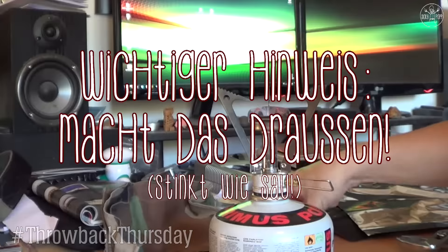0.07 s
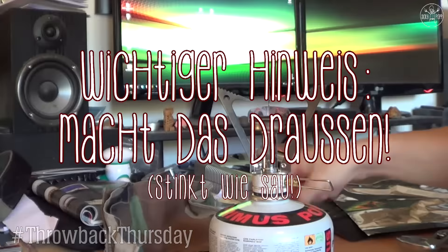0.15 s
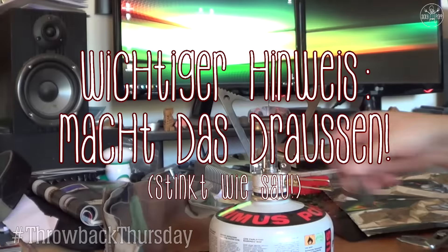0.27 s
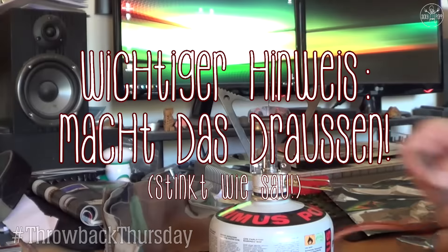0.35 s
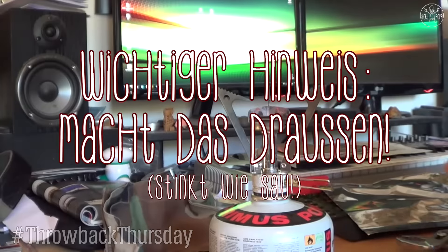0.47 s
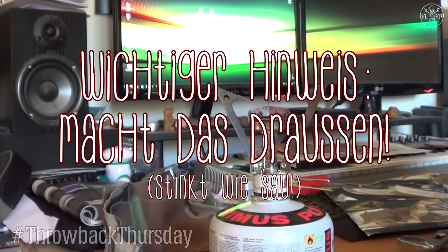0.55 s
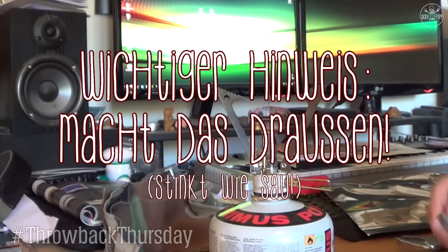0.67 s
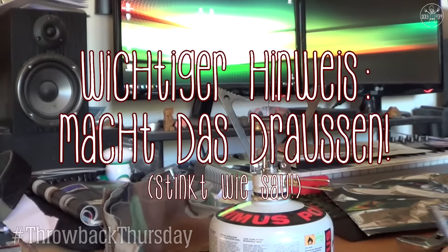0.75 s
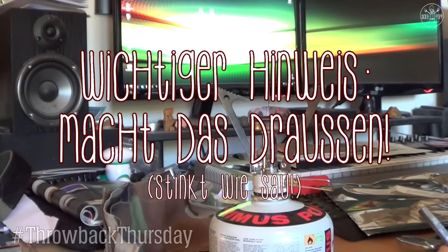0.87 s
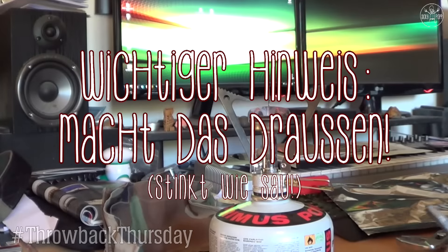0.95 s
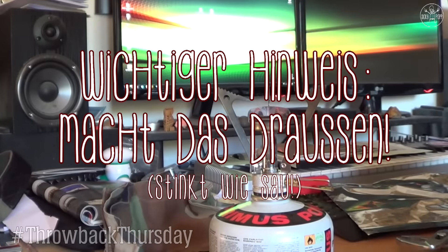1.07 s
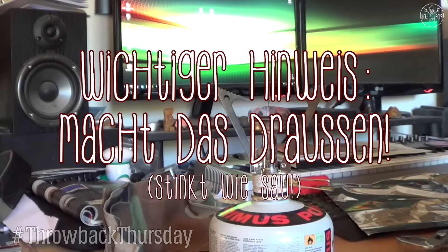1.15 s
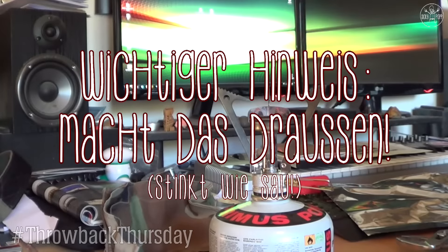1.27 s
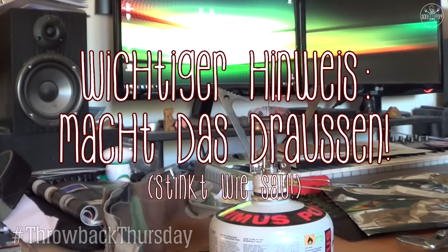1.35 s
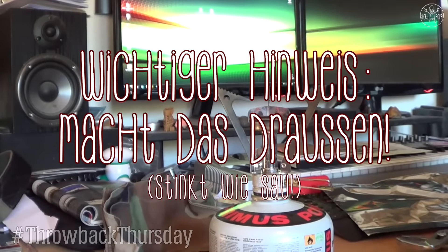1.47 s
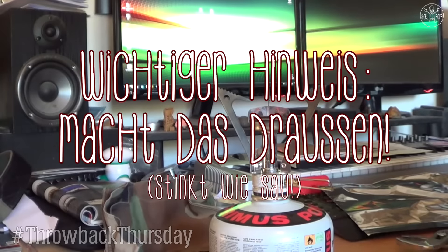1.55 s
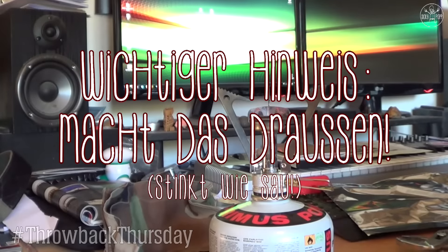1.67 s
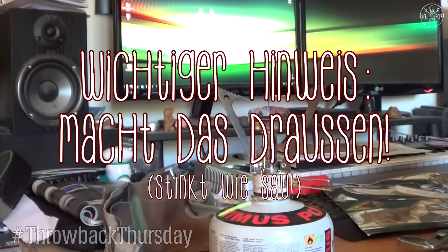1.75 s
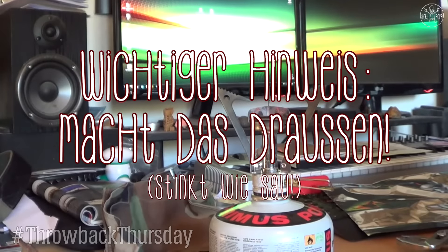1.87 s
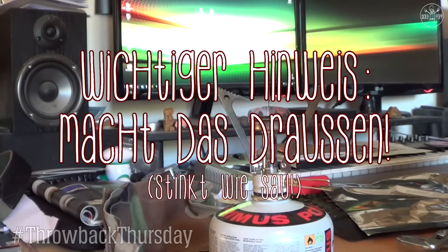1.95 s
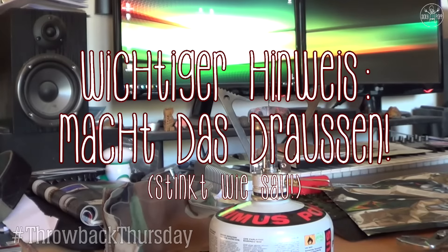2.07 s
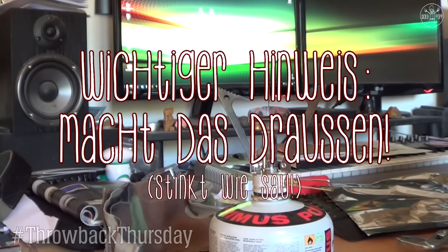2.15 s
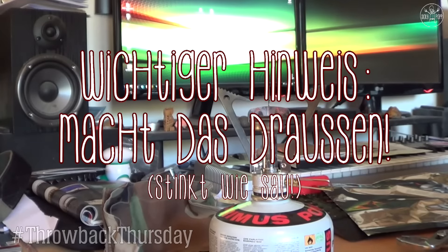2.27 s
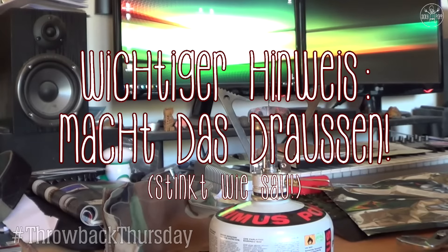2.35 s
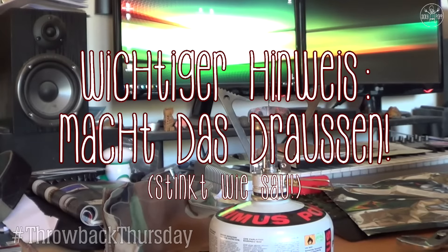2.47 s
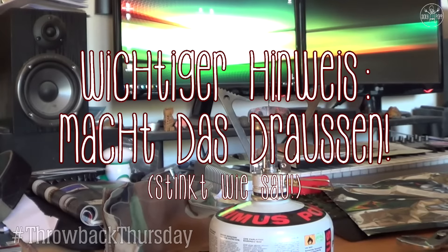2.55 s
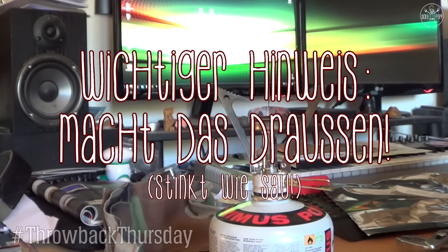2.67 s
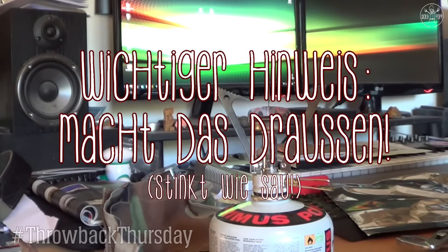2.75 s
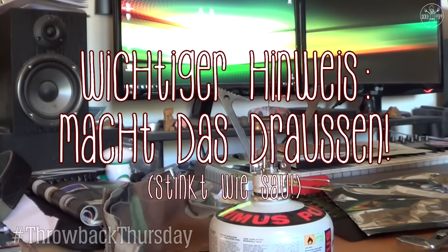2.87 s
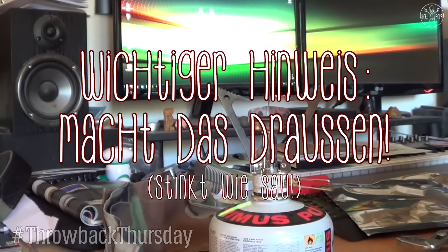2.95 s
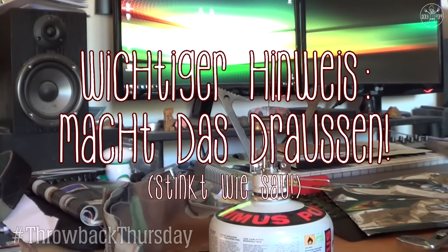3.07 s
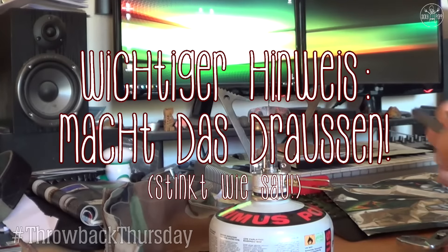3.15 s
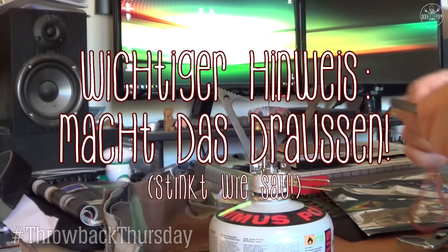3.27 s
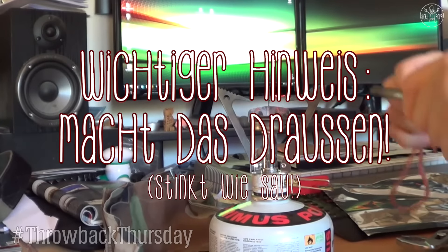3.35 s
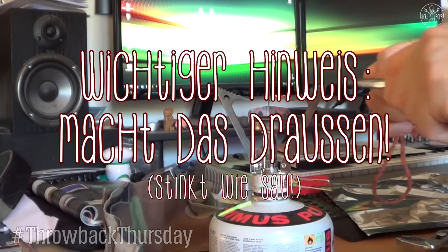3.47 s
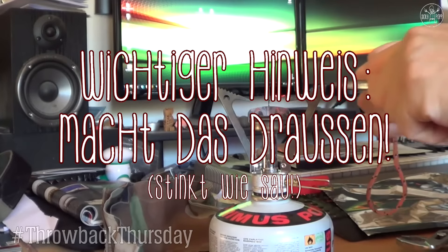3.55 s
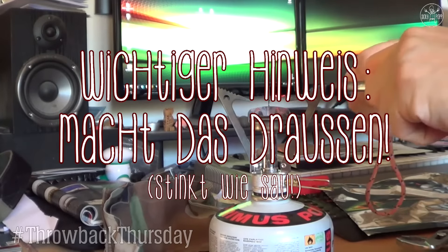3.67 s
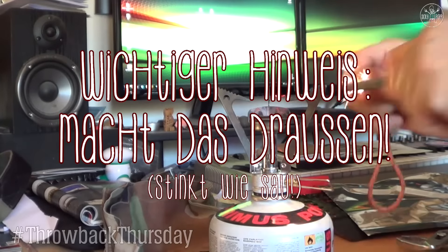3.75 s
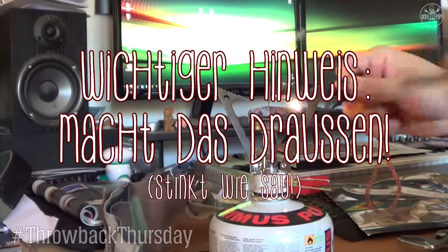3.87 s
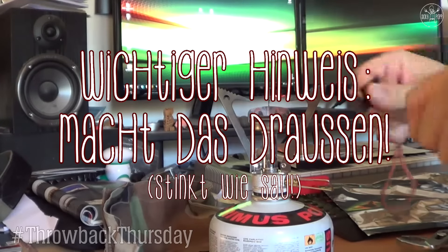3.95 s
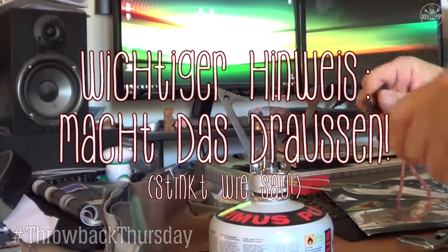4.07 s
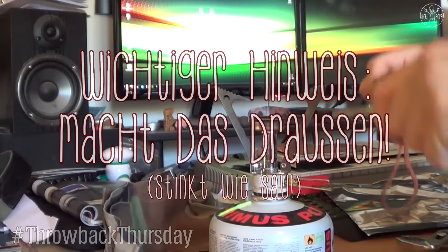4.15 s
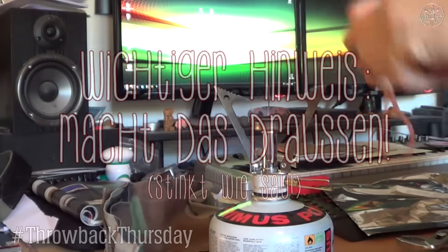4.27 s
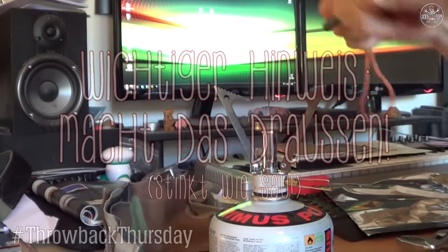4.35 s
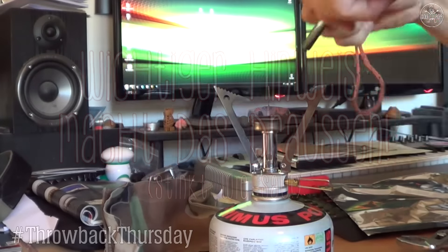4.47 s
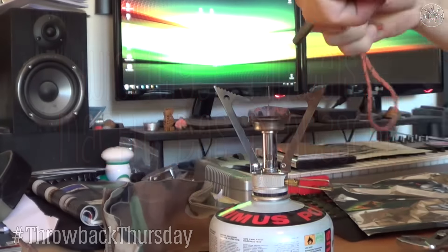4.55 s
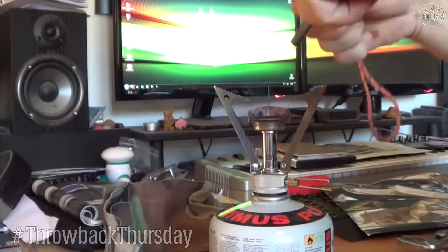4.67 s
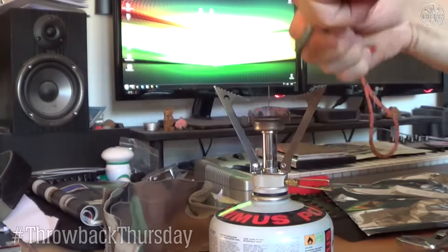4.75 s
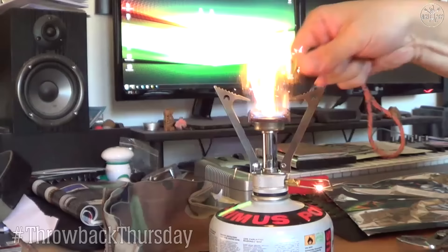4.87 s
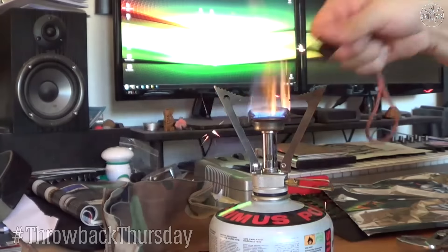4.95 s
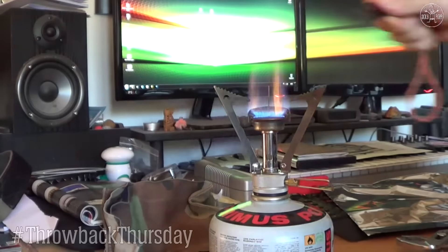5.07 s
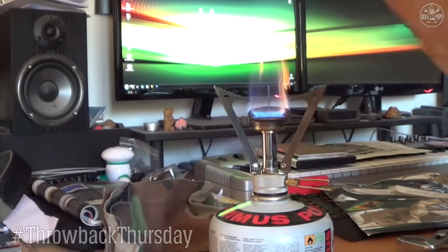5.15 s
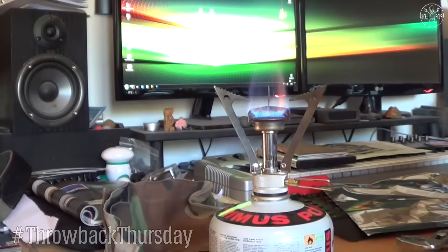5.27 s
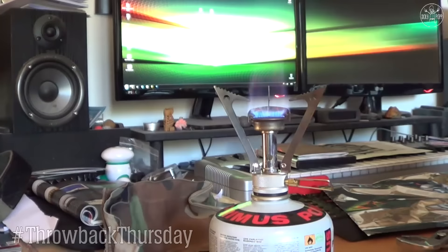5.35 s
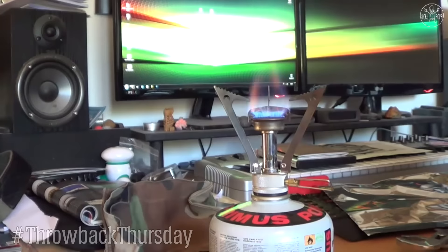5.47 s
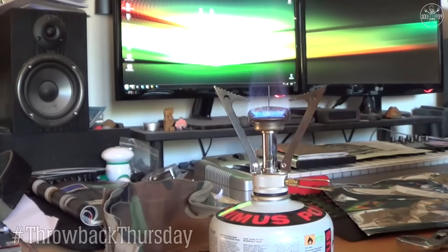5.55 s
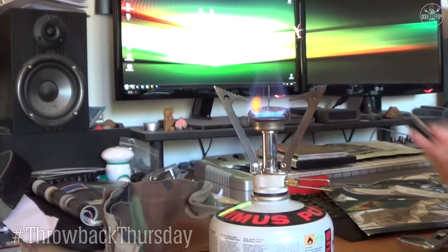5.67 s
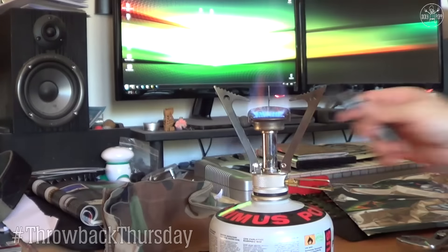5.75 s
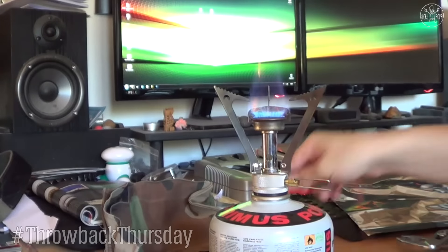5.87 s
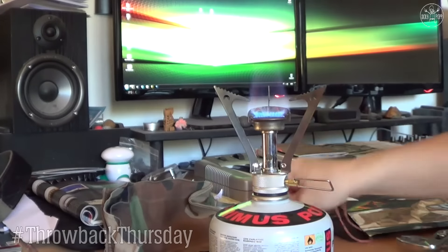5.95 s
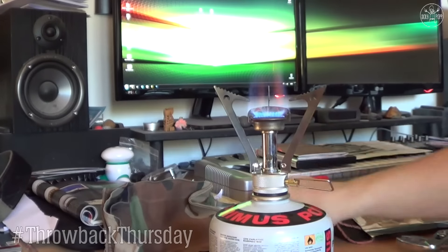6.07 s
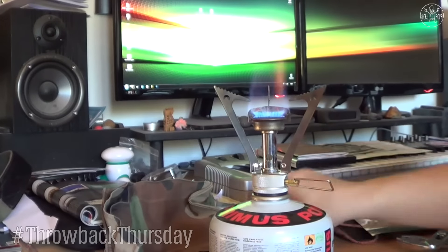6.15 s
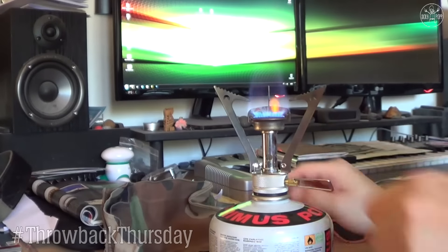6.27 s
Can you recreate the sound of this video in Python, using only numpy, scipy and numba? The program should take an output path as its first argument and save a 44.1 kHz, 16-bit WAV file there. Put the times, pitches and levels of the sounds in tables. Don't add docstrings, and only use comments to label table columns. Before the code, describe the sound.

Close stereo in a furnished room: steel tools clatter and ring on a desk for under a second, then knock again around 1.6 seconds. A faint gas hiss continues. Light ticks of handled metal lead to a harsh scrape, then a second that ignites the burner with a soft puff. The flame flutters and roars steadily; finally the tools drop and bounce loudly on the desk.

```python
import sys
import numpy as np
from scipy import signal
from scipy.fft import rfft, irfft, next_fast_len
from scipy.io import wavfile
from scipy.ndimage import uniform_filter1d, minimum_filter1d, map_coordinates
from numba import njit

SR = 44100
rng = np.random.default_rng(int(sys.argv[2]) if len(sys.argv) > 2 else 0)


def attenuation_scalar(level_db):
    decades = np.asarray(level_db, float) / 20
    return 10 ** decades


def unload_audio(sound):
    columns = np.transpose(np.atleast_2d(sound))
    steps = np.round(np.clip(columns, -1, 1) * 32767)
    wavfile.write(sys.argv[1], SR, steps.astype(np.int16))


N = 277874
TIME_S = np.arange(N) / SR

# frequency_hz, likeness (-1 to 1)
FAR_LIKENESS = [(60, 1), (400, 0.99), (1200, 0.24), (3000, 0.95), (7000, 1), (15000, 0.97)]
# start_s, main_modes_db, overtones_db
ROD_RINGS = [(0, -38, -49), (.133, -47, -46), (.288, -51, -60), (0.331, -28.5, -44), (.37, -30.5, -53),
             (.466, -23, -20), (0.487, -13, -24), (.511, -37, -29), (.522, -27, -25), (.554, -32, -33.5),
             (.613, -17, -50), (0.626, -21.5, -29), (.645, -31, -42), (.662, -42, -30), (.677, -46, -44),
             (1.55, -41, -42), (1.614, -23, -38), (1.631, -33.5, -43), (1.844, -32, -24.5),
             (1.874, -24.5, -29.5), (1.9, -25, -25.5), (5.435, -60, -26), (5.448, -62, -40),
             (6.073, -53, -48), (6.116, -34, -41), (6.131, -53, -63), (6.147, -55, -38),
             (6.178, -27.5, -29), (6.208, -26, -28), (6.248, -52, -30), (6.272, -36, -31.5)]
# start_s, main_modes_db, overtones_db
STRIKER_RINGS = [(0, -44, -55), (.133, -55, -51.5), (.309, -35, -39.5), (.37, -42.5, -42),
                 (.4717, -32, -32), (0.488, -22, -23), (.522, -25, -31.5), (.613, -26.5, -31),
                 (.645, -45, -26), (0.661, -27, -43), (.677, -53, -56), (1.549, -56, -58),
                 (1.616, -36.5, -42), (1.632, -30.5, -52), (1.749, -43, -68), (1.843, -32, -48),
                 (1.874, -42, -41.5), (1.9, -32, -47), (1.94, -50, -54), (5.435, -48, -26),
                 (5.448, -44, -48), (6.072, -37, -39), (6.116, -33.5, -43), (6.131, -60, -55),
                 (6.147, -27, -24.5), (6.178, -31, -38)]
SWELLS = [.37, .554, 1.75, 6.178]


def unit(x):
    return x / np.sqrt(np.mean(x ** 2) + 1e-20)


def along(points, hz):
    f, v = np.transpose(points)
    return np.interp(np.log(hz + 1), np.log(f + 1), v)


def wobble(rate):
    knots = rng.standard_normal(int(N * rate / SR) + 4)
    return map_coordinates(knots, [np.arange(N) * rate / SR])


def filtered(x, response):
    m = next_fast_len(N + SR // 2)
    return irfft(rfft(x, m) * response(np.fft.rfftfreq(m, 1 / SR)), m)[..., :N]


def resonances(peaks):
    def response(f):
        total = 0
        for k, (centre, width, db) in enumerate(peaks):
            total = total + (-1) ** k * attenuation_scalar(db) * 1j * f * width / (centre ** 2 - f * f + 1j * f * width)
        return total
    return response


def strokes(rows, rise, fall):
    s, db, hold = np.transpose(rows)[..., None]
    before = np.clip(s - TIME_S, 0, None)
    after = np.clip(TIME_S - s - hold, 0, None)
    return (db - rise * before - fall * after).max(axis=0)


def rush(spectrum, likeness, patchy_db):
    z = signal.stft(rng.standard_normal((2, N)), nperseg=512)[2]
    field = uniform_filter1d(rng.standard_normal(z.shape[1:]), size=6, axis=0)
    field = uniform_filter1d(field, size=10, axis=1)
    pair = signal.istft(z * attenuation_scalar(patchy_db * unit(field)), nperseg=512)[1][:, :N]

    def spread(hz):
        angle = np.arccos(np.clip(along(likeness, hz), -1, 1)) / 2
        return attenuation_scalar(along(spectrum, hz)) * [np.cos(angle), np.sin(angle)]

    mid, side = filtered(pair, spread)
    return unit(np.array([mid + side, mid - side]))


def grains(spectrum, rate, spread_db):
    size = attenuation_scalar(spread_db * rng.exponential(1, N))
    slips = (rng.random(N) < rate / SR) * rng.standard_normal(N) * size
    return unit(filtered(slips, lambda hz: attenuation_scalar(along(spectrum, hz))))


def cracks(times, dbs, hzs, t60s, width, strike=0):
    out, t = np.zeros(N + SR), np.arange(SR // 5) / SR
    hzs, t60s = np.broadcast_to(hzs, len(times)), np.broadcast_to(t60s, len(times))
    for s, db, hz, t60 in zip(times, dbs, hzs, t60s):
        noise = rng.standard_normal(len(t)) * attenuation_scalar(-60 * t / max(t60, .001)) + strike * (t == 0)
        edges = np.clip([hz / width, hz * width], 25, 14500)
        order = round(np.clip(.5 + hz / 400, 1.6, 3))
        burst = signal.lfilter(*signal.butter(order, edges, "band", fs=SR), noise)
        out[round(s * SR):][:len(t)] += attenuation_scalar(db) * burst / np.abs(burst).max()
    return out[:N]


def background():
    # start_s, level_db
    murmur_levels = [(1.3, -55), (2.2, -55.5), (2.68, -50.5), (3.08, -54.5)]
    # frequency_hz, density_db
    murmur_spectrum = [(15, -36), (25, -5), (46, 6), (64, -20), (109, -3), (143, -9), (167, -2.5),
                       (275, -6.5), (327, -1.5), (350, -11), (430, -7.5), (537, -9.5), (585, -8),
                       (1500, -17), (1950, -44), (3300, -120)]
    # start_s, level_db, hold_s
    drone_swells = [(3.23, -53.5, .4)]
    murmur_db = np.interp(TIME_S, *np.transpose(murmur_levels)) + 2.5 + 0.085 * wobble(8.3)
    murmur = attenuation_scalar(murmur_db) * rush(murmur_spectrum, FAR_LIKENESS, patchy_db=2.0)
    drone_db = strokes(drone_swells, rise=36, fall=85) + 10.5
    drone = attenuation_scalar(drone_db) * np.sin(2 * np.pi * 34 * TIME_S + .4 * wobble(3))
    whine_hz = 15625
    whine = attenuation_scalar(-68 + 3 * wobble(70)) * np.sin(2 * np.pi * whine_hz * TIME_S + .8 * wobble(150))
    return murmur + drone + whine


def walls(x):
    # frequency_hz, t60_s
    decay = [(200, 0.41), (2000, 0.31), (10000, 0.22)]
    hz, t, z = signal.stft(rng.standard_normal((2, SR // 2)), SR, nperseg=256)
    mid, side = signal.istft(z * attenuation_scalar(-60 * t / along(decay, hz)[:, None]), SR, nperseg=256)[1]
    tail = np.array([mid + 0.74 * side, mid - 0.14 * side])
    delayed = np.pad(x, (150, 0))[None]
    return signal.fftconvolve(delayed, tail / np.linalg.norm(tail[0]), axes=1)[:, :N]


def burner():
    # start_s, level_db
    jet_levels = [(1.2, -49.5), (2.2, -48.5), (4.85, -48.5), (4.97, -49), (5.6, -44.5)]
    # start_s, level_db
    flame_levels = [
        (4.79, -59),
        (4.836, -29),
        (5.432, -27),
        (5.454, -33.5),
        (5.47, -28.5),
        (6.07, -26.5),
        (6.27, -38),
    ]
    # frequency_hz, density_db
    jet_spectrum = [(710, -35), (1200, -21), (1250, -36), (1380, -9.5), (1980, -9.5), (2200, -4),
                    (3870, -6), (4360, -1.5), (5020, -5), (6440, -3.5), (8080, -14), (9310, -6),
                    (10700, -6), (14700, -25.5), (16000, -11)]
    flame_spectrum = [(24, -67), (40, -40), (75, -10.5), (262, -0.5), (422, -5), (663, 1), (1090, -13.5),
                      (1550, -14), (1810, -26), (2210, -14), (2500, -23.5), (3050, -22), (3700, -43),
                      (5050, -21), (8340, -29), (9690, -24), (16000, -53)]
    # frequency_hz, likeness (-1 to 1)
    near_likeness = [(60, .99), (500, 0.73), (1200, 0.78), (3000, 1), (7000, 1), (15000, .99)]
    jet_db = np.interp(TIME_S, *np.transpose(jet_levels)) + 3.5 + 0.13 * wobble(5.3)
    jet = attenuation_scalar(jet_db) * rush(jet_spectrum, FAR_LIKENESS, patchy_db=1.6)
    flutter_db = .3 * wobble(14) + .7 * wobble(55)
    flame_db = np.interp(TIME_S, *np.transpose(flame_levels), left=-150, right=-150)
    flame = attenuation_scalar(flame_db + flutter_db) * rush(flame_spectrum, near_likeness, patchy_db=0.3)
    return jet + flame


def chatter():
    # start_s, level_db, hold_s
    passes = [(.153, -36, 0.015), (.214, -37, 0.03), (.285, -36, .003)]
    count = np.floor(np.cumsum(230 * attenuation_scalar(3.3 * wobble(90))) / SR)
    catches = np.diff(count, prepend=0) * attenuation_scalar(rng.uniform(-12, 3.5, N))
    catches = catches + 0.041 * rng.standard_normal(N)
    body = resonances([(1500, 1600, 0)])
    return attenuation_scalar(strokes(passes, rise=200, fall=410)) * unit(filtered(catches, lambda f: body(f) ** 2))


def drag_level():
    # start_s, level_db, hold_s
    drags = [(0, -24.5, 0.017), (.29, -31.5, 0.042), (.468, -28.5, .002), (.55, -32, 0.14),
             (1.55, -37, .002), (1.604, -31, .002), (1.843, -25.5, 0.0043), (6.074, -24.5, .002),
             (6.104, -25, 0.21)]
    return strokes(drags, rise=23000, fall=275)


def friction():
    # start_s, level_db, hold_s
    scrapes = [
        (3.768, -22, 0.048),
        (4.803, -21.5, 0.022),
        (5.962, -34, 0.025),
    ]
    # start_s, level_db, hold_s
    bites = [
        (3.758, -24, 0.032),
        (4.787, -28.5, 0.011),
    ]
    # frequency_hz, density_db
    rub_spectrum = [(240, -16), (400, -15.5), (442, -3), (566, -8.5), (905, -4), (1060, -10), (1300, -6),
                    (4530, -17), (5800, -17), (10500, -22), (13000, -38), (15000, -60)]
    rasp_spectrum = [(1470, -19.5), (2500, -5), (2750, -11), (3610, -12.5), (6390, 0), (10100, -1),
                     (13700, -9.5), (15700, -17), (16200, -46)]
    grit_spectrum = [(150, -37), (250, -11), (592, -4.5), (771, -6.5), (1500, -10.5), (2750, -10),
                     (3500, -7), (4550, -35), (7700, -120)]
    # frequency_hz, width_hz, level_db
    sing_peaks = [(2800, 800, -3.5), (6300, 780, -2), (9600, 2000, -1)]
    drag = attenuation_scalar(drag_level() + 2.4 * wobble(130)) * grains(rub_spectrum, rate=5000, spread_db=1.5)
    scrape_db = strokes(scrapes, rise=960, fall=500)
    late_db = np.roll(scrape_db, round(0.025 * SR))
    low_db = np.minimum(scrape_db, late_db) - 9.5
    stutter_db = 2.9 * wobble(170)
    fine = attenuation_scalar(scrape_db + stutter_db) * grains(rasp_spectrum, rate=13000, spread_db=1.0)
    low = attenuation_scalar(low_db + stutter_db) * grains(grit_spectrum, rate=9800, spread_db=0.5)
    tone = unit(filtered(rng.standard_normal(N), lambda f: resonances(sing_peaks)(f) ** 2))
    sing = attenuation_scalar(strokes(bites, rise=2000, fall=690) + stutter_db) * tone
    return drag + fine + low + sing


def thumps():
    # start_s, peak_db, pitch_hz
    blows = [(.001, -29, 350), (.0011, -17, 2100), (.134, -33, 350), (.222, -34, 340), (.28, -35.5, 370),
             (.678, -25, 1000), (.89, -37.5, 124), (.948, -45, 570), (.95, -43, 330), (1.549, -21, 460),
             (1.843, -14, 750), (3.8, -34.5, 206), (4.81, -25, 78), (4.826, -22.5, 110), (4.84, -23, 120)]
    return cracks(*np.transpose(blows), 0.21, width=1.89)


def hollow_knocks():
    # level_db, pitch_hz, t60_s
    modes = [(-22, 897, 0.17), (-33, 770, 0.17), (-27, 590, 0.14), (-34, 1136, 0.52), (-29, 1136, 0.27),
             (-30.5, 1136, 0.24), (-28.5, 3182, 0.79), (-46, 63, 0.34), (-40, 54, 0.21), (-28, 490, 0.14),
             (-26, 780, 0.3), (-23, 970, 0.43), (-38, 3180, 1.24), (-37, 3180, 0.36), (-35, 818, .15),
             (-31, 1560, 0.19), (-32, 1780, 0.17), (-27.5, 3182, 0.52), (-26, 3165, 0.25),
             (-33, 308, 0.093), (-32, 200, .07), (-41.5, 350, 0.084), (-25.5, 895, 0.12), (-43, 4750, 0.76),
             (-40, 4750, 0.9)]
    starts = [.682, .715, .665, .323, 1.549, 1.615, .325, .9, .7, 1.549, 6.14, 6.175, 1.56, 1.85, .684,
              .684, .68, .545, 6.145, .886, .872, .955, .72, 1.66, .335]
    out = np.zeros(N)
    for start, (db, hz, t60) in zip(starts, modes):
        since = np.clip(TIME_S - start, 0, None)
        level = attenuation_scalar(db - 60 * since / t60) * (1 - np.exp(-since / 0.0016)) * attenuation_scalar(1.6 * wobble(60))
        out += level * np.sin(2 * np.pi * hz * since + 1.07 * wobble(45))
    return out


def ticks():
    # start_s, peak_db, pitch_hz
    touches = [(2.312, -30.5, 6300), (3.2747, -28, 6340), (3.292, -26, 8900), (3.2975, -30.5, 6500),
               (3.369, -35, 3000), (3.4695, -19, 6000), (3.4935, -31, 2900), (3.497, -30, 2870),
               (3.981, -25.5, 8600), (4.2653, -15, 6900), (4.3386, -21, 7010), (4.342, -25, 7000),
               (4.3465, -16, 6800), (4.5021, -17, 2760), (4.5026, -13.5, 6440), (4.523, -15, 6860),
               (4.544, -18, 7000), (4.5104, -22, 2640), (4.5226, -15.5, 2830), (4.5435, -19, 2850),
               (4.5558, -27, 9150), (4.5555, -22, 2380), (4.789, -17, 6500), (4.797, -13, 6400),
               (4.894, -23, 9500), (4.923, -24, 11000), (5.568, -23, 10500), (5.61, -21, 10000),
               (5.695, -24, 9500), (.288, -22, 7500), (.309, -19, 7500), (.3225, -16, 5500),
               (4.8543, -15, 6300), (4.9358, -17.5, 7300), (4.9874, -29, 5200), (4.9365, -18.5, 11900),
               (5.22, -32, 12000), (5.2585, -33, 4000), (5.285, -37, 12400), (5.436, -19, 11600),
               (5.4466, -14.5, 9200), (5.5872, -19.5, 6450), (5.6489, -30, 5050), (5.865, -27, 11000),
               (5.9, -30, 9650), (1.55, -33, 5500), (1.604, -28, 6500), (1.6165, -11.5, 5230),
               (1.843, -29, 5040), (6.0725, -13, 7600), (6.078, -19, 7550), (6.105, -10, 4200),
               (6.1765, -15, 6600), (6.208, -5, 6500), (6.2225, -12, 6000), (6.2485, -11, 5400),
               (6.272, -8.5, 6560), (6.283, -17, 4970)]
    # frequency_hz, width_hz, level_db
    gripped = [(840, 460, -4), (1590, 420, 3), (2800, 590, 0.5), (4000, 320, 1.5), (6300, 630, 1),
               (8650, 610, -1), (12900, 2500, -10)]
    s, db, hz = np.transpose(touches)
    t60_s = 0.011
    bright = cracks(s, db, hz, t60_s, width=1.41, strike=3.25)
    push = cracks(s, db - 0.5, 3600, t60_s, width=5.0, strike=1.2)
    return bright + filtered(push, resonances(gripped))


def clinks():
    # start_s, peak_db, crack_hz
    hits = [(.0024, -11, 1800), (0.0169, -22, 1730), (0.0219, -21, 1800), (0.0382, -13, 1390),
            (0.1333, -26, 1500), (0.2876, -6, 2070), (0.309, -19, 2120), (0.321, -13, 2000),
            (0.4642, -15, 3550), (.471, -2, 3860), (.475, -19, 3000), (0.477, -11, 1100),
            (0.481, -22, 4600), (0.5112, -22, 2000), (.5214, -42, 3160), (0.5538, -3.5, 3070),
            (0.5553, -6, 2800), (0.5682, -13, 3060), (0.6125, -18, 3910), (0.628, -28, 3150),
            (0.646, -8.5, 2960), (0.661, -13, 2900), (0.663, -12, 2930), (0.6761, -5.5, 3180),
            (0.6794, -6.5, 2870), (.686, -12, 3070), (0.8779, -31, 1300), (0.9482, -36, 1170),
            (1.5496, -17.5, 2750), (1.553, -20, 2000), (1.6035, -18, 2240), (1.6151, -13.5, 2250),
            (1.842, -10.5, 3300), (1.8427, -9, 2200), (1.848, -16, 1100), (1.857, -15, 3120),
            (1.867, -16, 2300), (1.8738, -9, 3880), (1.8878, -13, 3920), (1.897, -15, 4000),
            (1.9, -9.5, 2400)]
    # start_s, peak_db, crack_hz
    bounces = [(6.0729, -9, 1110), (6.077, -17, 1200), (6.104, 5, 1270), (6.11, -13.5, 1500),
               (6.115, -15, 1290), (6.121, -22, 1500), (6.1332, -0.5, 1510), (6.1385, -6, 1290),
               (6.1414, -10, 1800), (6.1468, -17, 1520), (6.155, -18, 1500), (6.162, -28, 1500),
               (6.176, -11, 1300), (6.184, -21, 1210), (6.19, -7, 1430), (6.2124, -8, 1080),
               (6.226, -22, 1200), (6.237, -14, 1060), (6.2479, -3, 1840), (6.257, -10, 1800),
               (6.262, -13, 1443), (6.2714, -16, 1260), (6.283, -22, 1690), (6.287, -12, 1190)]
    # frequency_hz, width_hz, level_db
    desk = [(220, 140, -3), (363, 42, 1), (513, 29, 0.5), (770, 67, -1), (922, 65, 2), (1260, 250, -10)]
    grip = [(770, 57, -7), (950, 50, 2.5), (1290, 70, -4), (1690, 50, -4.5), (1800, 50, -3), (2200, 90, -8),
            (2480, 70, -7), (2750, 90, -7), (3580, 200, -14), (4330, 250, -10)]
    s, db, hz = np.transpose(hits + bounces)
    dropped = np.arange(len(s)) >= len(hits)
    thud_db = 13 + 0.47 * db + 5 * dropped
    blows = np.bincount(np.round(s * SR).astype(int), attenuation_scalar(thud_db), N)
    drop_s, drop_db, _ = np.transpose(bounces)
    taps = np.bincount(np.round(drop_s * SR).astype(int), attenuation_scalar(drop_db + 16), N)
    snap = cracks(s, db, hz, 0.015, width=1.624, strike=7.2)
    return snap + filtered(blows, resonances(desk)) + filtered(taps, resonances(grip))


def hard_edges():
    # start_s, peak_db, pitch_hz
    blows = [(.466, 14, 3450), (0.47, 0, 2930), (0.487, -7, 5000), (0.521, -1, 7200), (.554, 0.5, 2900),
             (0.614, 0.5, 7000), (.677, 2, 4160), (6.072, -8, 1500), (6.1048, 5, 1300), (6.132, 16.5, 1500)]
    return cracks(*np.transpose(blows), 0.0025, width=1.86)


def ringing():
    held = [0, .325, .4867, .677, 1.549, 1.615, 1.843, 1.899, 1.94, 5.448, 6.073, 6.147, 6.23, 6.272]
    marks = np.sort([s for s, *_ in ROD_RINGS + STRIKER_RINGS] + held + SWELLS)

    def at(times):
        return np.abs(marks[:, None] - times).min(axis=1) < .004

    rate = np.where(at(held), -255, np.where(at(SWELLS), 82, -40))
    fade = np.cumsum(rate[np.maximum(np.searchsorted(marks, TIME_S, side="right") - 1, 0)]) / SR
    levels = []
    for s, *dbs in (np.transpose(ROD_RINGS), np.transpose(STRIKER_RINGS)):
        row = np.maximum(np.searchsorted(s, TIME_S, side="right") - 1, 0)
        first = np.clip(np.round(s * SR).astype(int), 0, N - 1)[row]
        levels.append([(db[row] + fade - fade[first], TIME_S - s[row]) for db in dbs])
    rod, striker = levels
    return [rod[0], striker[0], rod[1], striker[1]]


def steel():
    mode_hz = [3178, 6220, 4748, 7838, 8660, 9505, 14730, 13400, 11630, 15470, 12560]
    # level_db, follows (0 rod, 1 striker, 2 and 3 their overtones), twin_offset_hz,
    # twin_share (0-1), own_damping_db_per_s
    modes = [(-14.5, 2, 16, 0.52, 16), (4, 0, 12, 0.34, 13), (-26, -2, 31, 0.27, 19), (-11, 3, 22, .4, 15),
             (5, 1, 14, 0.14, -11), (6, 2, 36, 0.18, 16), (-9, 2, 10, 0.22, 52), (-28, 2, 20, .3, 5),
             (6.5, 3, 60, 0.76, 32), (-3, 3, 150, 1, 50), (-17, 3, 20, .3, 5)]
    # start_s, peak_db, pitch_hz, t60_s
    shivers = [
        (6.2, -13, 9400, 0.072),
        (5.434, -17.5, 11700, 0.09),
        (5.449, -17, 9560, 0.13),
    ]
    rings = ringing()
    struck = np.array([r for r in ROD_RINGS + STRIKER_RINGS if np.abs(r[0] - np.array(SWELLS)).min() > .004])
    snaps = cracks(struck[:, 0], struck[:, 1:].max(axis=1) + 7.3, 7800, 0.009, width=1.36)
    out = snaps + cracks(*np.transpose(shivers), width=1.02)
    rattle = np.clip((drag_level() + 45) / 22, .15, 1)
    for hz, (db, follows, twin_hz, share, damping) in zip(mode_hz, modes):
        shake_db = .8 * wobble(25) + 2.5 * rattle * wobble(130)
        ring_db, since = rings[round(follows)]
        level = attenuation_scalar(ring_db + db - damping * np.minimum(since, .3) + shake_db)
        phase = 1.46 * rattle * wobble(90) + 1.15 * wobble(26)
        main = np.sin(2 * np.pi * hz * TIME_S + phase)
        twin = share * np.sin(2 * np.pi * ((hz + twin_hz) * TIME_S + rng.random()))
        out += uniform_filter1d(level, size=90) * (main + twin)
    return out


def scene():
    knocks = clinks() + ticks() + thumps() + hollow_knocks() + friction() + chatter()
    rings, edges = steel(), hard_edges()
    direct = knocks + rings * attenuation_scalar([[-1.2], [1.2]]) + edges
    reflected = walls(attenuation_scalar(-6.5) * knocks + attenuation_scalar(-8.5) * rings + attenuation_scalar(-16.0) * edges)
    return direct + reflected + burner() + background()


@njit
def recover(gain, step):
    out = gain.copy()
    for i in range(1, len(out)):
        out[i] = min(gain[i], out[i - 1] + step * (1 - out[i - 1]))
    return out


def top_cut(x):
    return signal.sosfilt(signal.butter(12, 16480, fs=SR, output="sos"), x)


def record(dry):
    # frequency_hz, left_minus_right_db
    tilt = [(60, 1), (110, 0), (200, -0.5), (380, -1.5), (700, -6), (1290, -5.5), (2380, -6), (4400, -3),
            (8120, -2), (15000, 1.5)]
    # frequency_hz, phase_rad
    lead = [(0, 0.99), (520, -0.71), (1640, -0.63), (3190, 0.2), (3530, 1), (3790, 0.5), (8440, 0.44),
            (16000, -0.0036)]

    def ports(hz):
        band = (hz / 70) ** 2 / (1 + (hz / 70) ** 2) / (1 + (hz / 15800) ** 150)
        half = attenuation_scalar(along(tilt, hz) / 2) * np.exp(.5j * along(lead, hz))
        return band * np.array([half, 1 / half])

    x = filtered(dry, ports)
    need = np.minimum(1, attenuation_scalar(-5.5) / (np.abs(x).max(axis=0) + 1e-9))
    ahead = minimum_filter1d(need, size=131, origin=-58)
    gain = uniform_filter1d(recover(ahead, 1 / (0.0034 * SR)), size=9)
    return top_cut(x * gain)


dry = scene()
out = record(dry)
unload_audio(out)
```